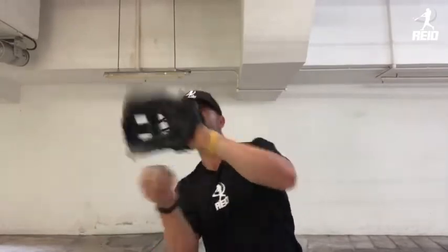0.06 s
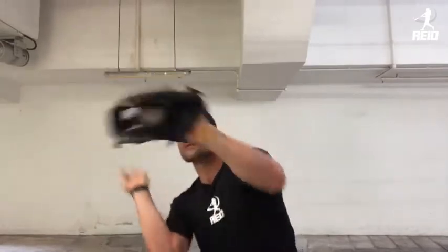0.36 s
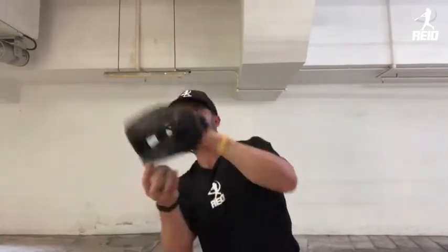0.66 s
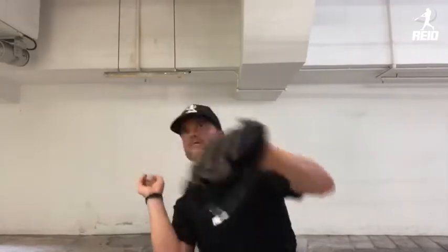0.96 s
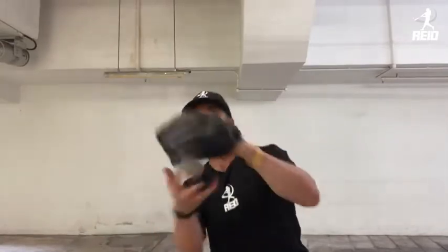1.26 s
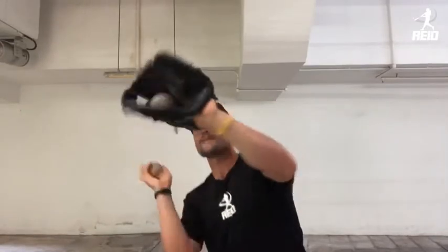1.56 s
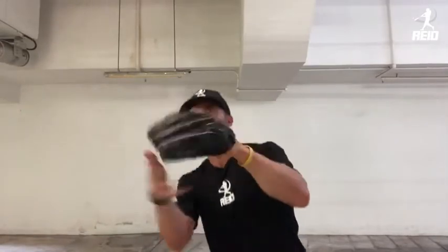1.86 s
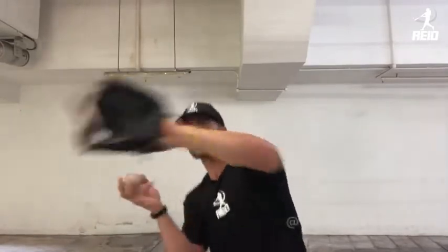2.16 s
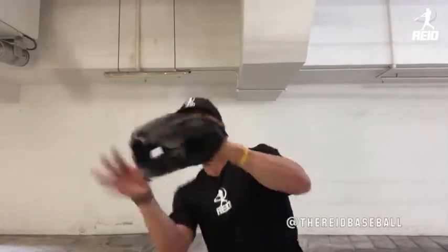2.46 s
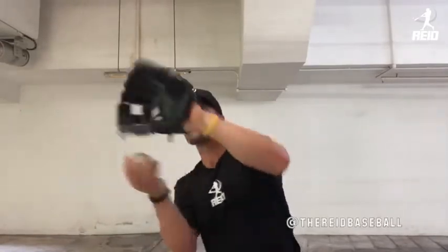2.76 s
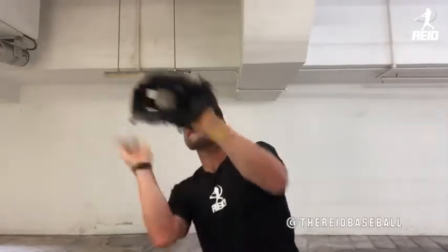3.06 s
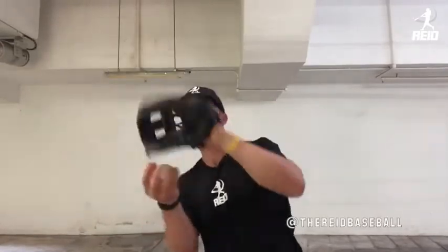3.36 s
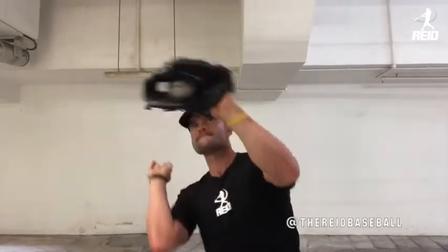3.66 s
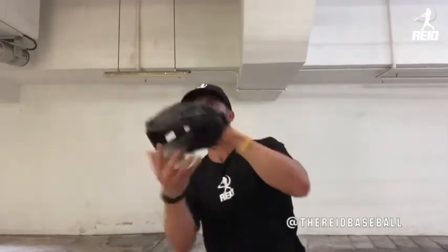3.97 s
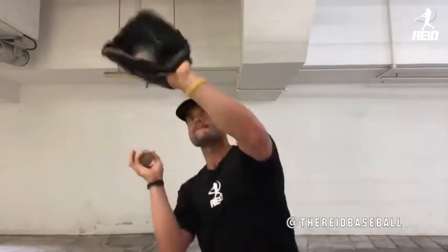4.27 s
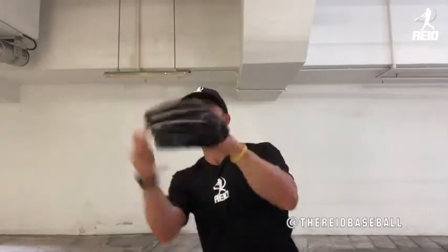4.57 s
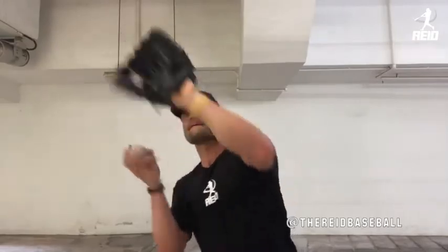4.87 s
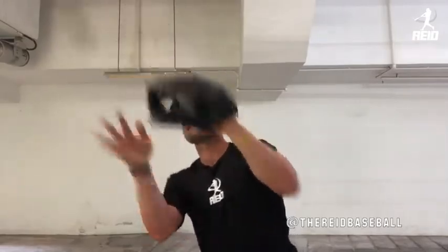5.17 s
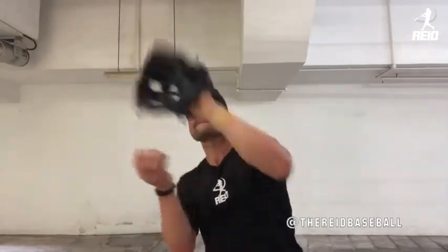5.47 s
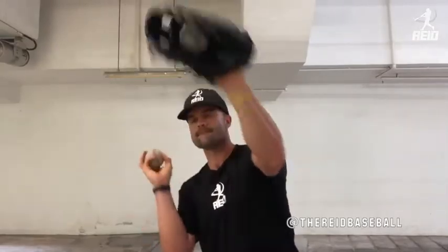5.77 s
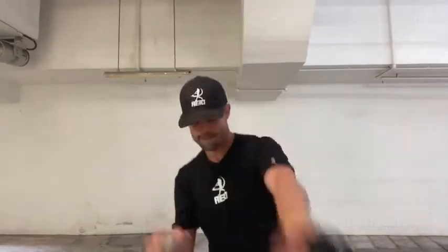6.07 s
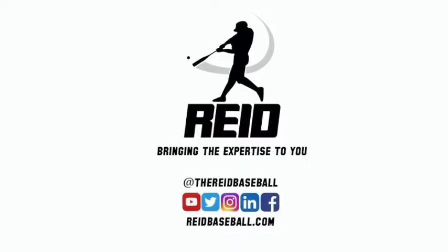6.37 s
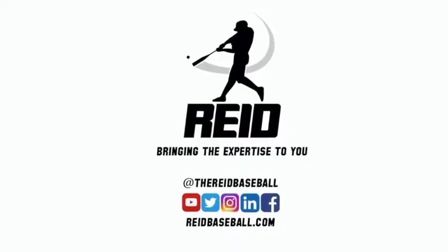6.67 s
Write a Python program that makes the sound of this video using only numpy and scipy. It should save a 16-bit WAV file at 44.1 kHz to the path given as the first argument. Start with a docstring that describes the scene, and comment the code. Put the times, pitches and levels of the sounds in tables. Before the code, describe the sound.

A ball hits a concrete wall with a sharp crack, a brief ring and a thump, then lands in a leather glove with a duller slap, pop and rustle. This repeats nine times at a quick, even pace, some catches soft and doubled, others firm. Faint bright ticks precede several wall hits. The microphone is close, in a bare hall with echoes, a long tail and steady ventilation hum. The sound stops abruptly.

```python
"""A sharp crack, a brief ring and a thump: a ball hits a concrete wall, again and again.
Between hits it lands in a leather glove close by, a duller slap with a pop and a rustle.
The ball and the glove's pocket ring in damped modes; cover and leather give short bursts of noise.
Faint, bright ticks come shortly before some of the wall hits. The bare hall answers with echoes
and a long tail, over the rush and hum of ventilation."""
import sys
import numpy as np
from scipy import signal
from scipy.fft import rfft, irfft
from scipy.io import wavfile
from scipy.ndimage import uniform_filter1d

SR = 44100
rng = np.random.default_rng(int(sys.argv[2]) if len(sys.argv) > 2 else 0)


def to_wav(s):
    """Save 16-bit WAV."""
    ch = np.atleast_2d(s).T  # columns
    pcm = np.round(np.clip(ch, -1, 1) * 32767)  # PCM
    wavfile.write(sys.argv[1], SR, pcm.astype(np.int16))


N = 296352

# bright colour of the leather's rustle and the faint ticks: f/Hz, level/dB
RUSTLE_COLOUR = [(2000, -22), (5000, -3), (7500, 3), (11000, -2), (16000, -5.5)]


def undb(db):
    """Decibels to gain."""
    return 10 ** (np.asarray(db) / 20)


def unit(x):
    """Scale to an energy of one."""
    return x / np.sqrt(np.sum(x ** 2) + 1e-20)


def add(track, s, sound):
    """Mix a sound into a track at s seconds."""
    start = max(int(s * SR), 0)
    track[start:start + len(sound)] += sound[:N - start]


def along(hz, points, values):
    """Read a curve on a log frequency axis."""
    return np.interp(np.log(np.maximum(hz, 1)), np.log(points), values)


def drift(rate_hz):
    """A slow random wander with a spread near one."""
    step = int(SR / rate_hz)
    return uniform_filter1d(np.repeat(rng.standard_normal(N // step + 1), step), step)[:N]


def colour(x, spectrum, size=4096):
    """Minimum-phase EQ through points of f/Hz, level/dB."""
    log_gain = np.log(undb(along(np.fft.rfftfreq(size, 1 / SR), *np.transpose(spectrum))))
    cepstrum = irfft(log_gain)
    cepstrum[1:size // 2] *= 2
    cepstrum[size // 2 + 1:] = 0
    return signal.fftconvolve(x, irfft(np.exp(rfft(cepstrum))))[:len(x)]


def ring(modes, part_db, ratio=1, size=2048):
    """Heavily damped modes that swell as the contact builds; no two blows land alike."""
    out = np.zeros(size)
    for hz, swell_s, db, lag_s, part in modes:
        t = np.maximum(np.arange(size) / SR - lag_s, 0)
        pitch = hz * ratio * (1 + .025 * rng.standard_normal())
        envelope = t ** 2 * np.exp(-t / swell_s)
        out += undb(db + part_db[part]) * unit(envelope * np.sin(2 * np.pi * pitch * t))
    return out


def burst(spectrum, decay_s, click=0, size=2048):
    """A patter of tiny contacts that dies quickly, led by one clean click if the contact is hard."""
    patter = unit(rng.standard_normal(size) * np.exp(-np.arange(size) / SR / decay_s))
    patter[0] += click
    return unit(colour(patter, spectrum))


def floor_reflection(x, delay_s, band_hz=(600, 12000)):
    """A late, band-limited copy off the floor that combs the mids when mixed with the direct sound."""
    i = np.arange(len(x))
    late = np.interp(i - delay_s * SR, i, x, left=0)
    return signal.sosfilt(signal.butter(1, band_hz, "band", fs=SR, output="sos"), late)


def wall_hits(crack_db=-2, snap_db=-2.7, snap_swell_s=.0002, grit_s=.00065, second_reflection_db=-11):
    """The hard cover cracks on concrete, the ball rings and thumps; returns near sound and hall send."""
    # ball on the wall: t/s, strength/dB, distance/m, hardness (-1 soft cover to 1 hard seam),
    # snap f/Hz, floor reflection lag/s
    hits = [(0.0, -1.3, 1.3, .45, 2750, .00108), (0.647, -1.6, .8, -1, 2870, .00107),
            (1.291, 0, .98, .55, 4500, .00111), (1.969, 0, .85, -.25, 4500, .00102),
            (2.6446, 1, 1.02, .85, 3500, .00104), (3.316, 1.1, 1.14, -.6, 3870, .00109),
            (4.0084, .7, 1.05, .4, 3800, .00109), (4.7272, .7, 1.0, .12, 2850, .00111),
            (5.351, -.3, 1.3, .2, 4490, .00111)]
    # layers of a hit, by name: level/dB at best hardness, best hardness, loss/dB per unit away from it
    layers = {"thump": (4.8, -1, 4.0), "knock": (-5.5, -.25, 6.5), "snap": (-1.5, 1, 5),
              "crack": (-1.5, 1, 3.3)}
    # modes of the ball: f/Hz, swell/s, level/dB, lag/s, layer
    ball_modes = [(331, 0.00089, -2, .0024, "thump"), (540, 0.00071, -7.2, 0.0014, "thump"),
                  (1124, .00042, 0.5, 0, "knock"), (1296, 0.00027, -14, 0.00069, "knock"),
                  (2047, .00032, -4, 0.0011, "knock")]
    # colour of the cover's crack: f/Hz, level/dB
    crack_colour = [(1500, -28), (2800, -3), (5000, -2.3), (7000, 0), (10000, -6.5), (16000, -8.5)]
    near, send = np.zeros((2, N))
    for s, strength_db, distance_m, hardness, snap_hz, lag_s in hits:
        part_db = {part: db + strength_db - loss_db * abs(hardness - best)
                   for part, (db, best, loss_db) in layers.items()}
        # the pitch of the snap depends on how seam and cover meet the wall
        body = ring(ball_modes + [(snap_hz, snap_swell_s, snap_db, 0, "snap")], part_db)
        crack_gain = undb(part_db["crack"] + crack_db)
        direct = body + crack_gain * burst(crack_colour, grit_s, click=2.2)
        # the corner of floor and wall throws the hit back twice
        first = floor_reflection(direct, lag_s)
        second = undb(second_reflection_db) * floor_reflection(first, lag_s)
        add(near, s, (direct + first + second) / distance_m)
        # the hall gathers all directions, which evens the grit out into a clean click
        add(send, s, body + crack_gain * burst(crack_colour, grit_s, click=10))
    return near, send


def hall(send, early_db=-3, far_wall_s=.028, bloom=.27, bloom_s=.035, bands=17):
    """A thin early field, distinct echoes, then a dense tail whose treble dies first."""
    # diffuse tail: f/Hz, level/dB, t60/s
    tail = [(60, -9, 1.1), (150.4, -3.5, 2.0), (280, -0.7, 3.7), (473, -3.6, 2.7), (750, 2.7, 1.3),
            (1120, 2.5, 0.7), (2000, 2.6, 1.4), (3900, -4, 0.85), (8000, -3.9, .68), (15840, -7.7, 0.55)]
    # echoes from ceiling, duct and far walls: delay/s, level/dB
    echoes = [(.0072, -16.5), (0.0114, -21.5), (0.0332, -19), (.0555, -24.5)]
    # standing waves of the hall: f/Hz, t60/s, gain at resonance/dB
    standing_waves = [(238.4, 0.61, 14), (300.6, 1.9, 8), (443.5, 1.7, 9)]
    t = np.arange(2 * SR) / SR
    hz, db, t60 = np.transpose(tail)
    centres = np.geomspace(hz[0], hz[-1], bands)
    noise, bins = rfft(rng.standard_normal(len(t))), np.fft.rfftfreq(len(t), 1 / SR)
    response = np.zeros(len(t))
    for centre, share in zip(centres, np.eye(bands)):
        band = irfft(noise * along(bins, centres, share))
        fade = unit(undb(-60 * t / along(centre, hz, t60)))
        response += undb(along(centre, hz, db)) * fade * band
    # the field blooms once the far wall has answered, then spreads out through the hall
    swell = 1 + bloom * np.exp(-np.abs(t - far_wall_s) / bloom_s)
    response *= np.where(t < far_wall_s, undb(early_db), swell)
    # pipes and ledges smear and dull each echo: f/Hz, level/dB
    echo_colour = [(400, -14), (900, -4), (1800, -4), (4000, -13), (16000, -25.5)]
    for delay_s, echo_db in echoes:
        add(response, delay_s, undb(echo_db) * burst(echo_colour, decay_s=.0018, click=.61))
    for mode_hz, mode_t60, mode_db in standing_waves:
        fade = undb(-60 * t / mode_t60)
        tone = np.sin(2 * np.pi * (mode_hz * t + rng.random()))
        response += undb(mode_db) * 2 * fade / fade.sum() * tone
    return signal.fftconvolve(send, response)[:N]


def ventilation(air_db=-44.5, waver_db=2.0):
    """A bed of air rushing in ducts, with a wavering motor hum."""
    # colour of the duct air: f/Hz, relative level/dB
    air_colour = [(25, -38), (38, -22.5), (55, -6), (80, -13), (100, -7), (130, -7), (190, -5.5), (235, -3),
                  (330, -2), (450, -4), (620, -9.5), (950, -7.5), (1700, -20.5), (3500, -26.5), (8000, -42),
                  (16000, -54)]
    # motor tones: f/Hz, level/dB
    motor_tones = [(100, -55.9), (300, -53), (883, -63)]
    t = np.arange(N) / SR
    air = colour(rng.standard_normal(N), air_colour)
    air *= undb(air_db + .5 * drift(6.3)) / np.std(air)
    hum = np.zeros(N)
    for hz, db in motor_tones:
        amplitude = np.sqrt(2) * undb(db + waver_db * drift(6))
        hum += amplitude * np.sin(2 * np.pi * hz * t + .29 * drift(5))
    return air + hum


def glove_catches(brush_db=-13, brush_lead_s=.005, slap_s=.0023, rustle_s=.0076, pocket_send_db=-5.5):
    """The ball brushes the webbing, the pocket pops, leather slaps; returns near sound and hall send."""
    # ball on the glove: t/s, strength/dB, depth (0 webbing to 1 square in the pocket), pitch ratio
    contacts = [(0.2804, -16.3, .1, 1), (0.3146, -11.7, .74, 1), (0.9143, -2.6, 1, 1.15),
                (1.5447, -22.5, .7, .95), (1.567, -17.5, .35, .97), (1.5782, -18, .7, 1.15),
                (2.2193, -17, 0, 1), (2.2475, -15, .42, 1), (2.916, -23.5, .2, 1), (2.952, -18.5, .62, .95),
                (3.5652, -10.5, .55, .85), (3.6067, -15.7, .45, .95), (4.304, -1, .27, 1),
                (5.0161, -7.5, .35, 1.3), (5.643, -16, .15, 1), (5.658, -14, .35, 1.25)]
    # layers of a catch, by name; the padding's low notes grow slowly with strength:
    # level/dB at best depth, growth/dB per dB of strength, best depth, loss/dB per unit away from it
    layers = {"thud": (-5, .5, .7, 12), "thump": (2.5, .75, .55, 13), "pop": (8.2, .96, 1, 11),
              "knock": (1.5, 1.15, 1, 8), "slap": (-.7, 1, 0, 1.5), "rustle": (-6.5, 1, 0, 12.5)}
    # modes of the pocket: f/Hz, swell/s, level/dB, lag/s, layer
    pocket_modes = [(146, 0.0027, 1.5, .004, "thud"), (275, 0.00096, 1, 0.0037, "thump"),
                    (600, 0.0014, -9, 0, "pop"), (963, 0.00055, 1, 0.00014, "pop"),
                    (1297, 0.00054, -3, 0, "pop"), (1750, .00025, -6.5, 0.00042, "knock")]
    # colour of slapping leather: f/Hz, level/dB
    slap_colour = [(200, -36.5), (800, -18), (2000, -1), (3500, -0.5), (6000, -6), (9000, -19),
                   (16000, -32.5)]
    near, send = np.zeros((2, N))
    for s, strength_db, depth, ratio in contacts:
        part_db = {part: db + growth * strength_db - loss_db * abs(depth - best)
                   for part, (db, growth, best, loss_db) in layers.items()}
        pocket = ring(pocket_modes, part_db, ratio)
        slap_gain, rustle_gain = undb(part_db["slap"]), undb(part_db["rustle"])
        add(near, s - brush_lead_s, slap_gain * undb(brush_db) * burst(slap_colour, decay_s=.008))
        slap = slap_gain * burst(slap_colour, slap_s, click=.13)
        rustle = rustle_gain * burst(RUSTLE_COLOUR, rustle_s)
        add(near, s, pocket + slap + rustle)
        # heard from all directions the leather has a more even colour
        even_slap = slap_gain * burst(slap_colour, slap_s, click=1.5)
        even_rustle = rustle_gain * burst(RUSTLE_COLOUR, rustle_s, click=.58)
        # the pocket faces the listener and feeds the hall less
        add(send, s, undb(pocket_send_db) * pocket + even_slap + even_rustle)
    return near, send


def faint_ticks():
    """Faint, bright ticks shortly before some of the wall hits."""
    # ticks: t/s, level/dB
    ticks = [(1.127, -42), (1.81, -40), (1.944, -30), (2.490, -39), (3.179, -39.5), (4.706, -33)]
    out = np.zeros(N)
    for s, db in ticks:
        add(out, s, undb(db) * burst(RUSTLE_COLOUR, decay_s=.0015))
    return out


def scene(wall_send_db=-1, glove_send_db=-4.4):
    """Hits, catches and ticks arrive directly and ring on in the hall, over the ventilation; mono."""
    wall, wall_send = wall_hits()
    glove, glove_send = glove_catches()
    ticks = faint_ticks()
    send = undb(wall_send_db) * wall_send + undb(glove_send_db) * (glove_send + ticks)
    return (wall + glove + ticks + hall(send) + ventilation())[None]


def record(dry, low_cut_hz=45, top_hz=16000, stop_s=6.08, fade_s=.003):
    """The phone drops the deep bass and cuts the top; the sound stops abruptly."""
    gate = np.clip((stop_s - np.arange(N) / SR) / fade_s, 0, 1)
    thinned = signal.sosfilt(signal.butter(2, low_cut_hz, "high", fs=SR, output="sos"), dry)
    return signal.sosfilt(signal.ellip(8, .2, 80, top_hz, fs=SR, output="sos"), thinned * gate)


dry = scene()
out = record(dry)
to_wav(out)
```